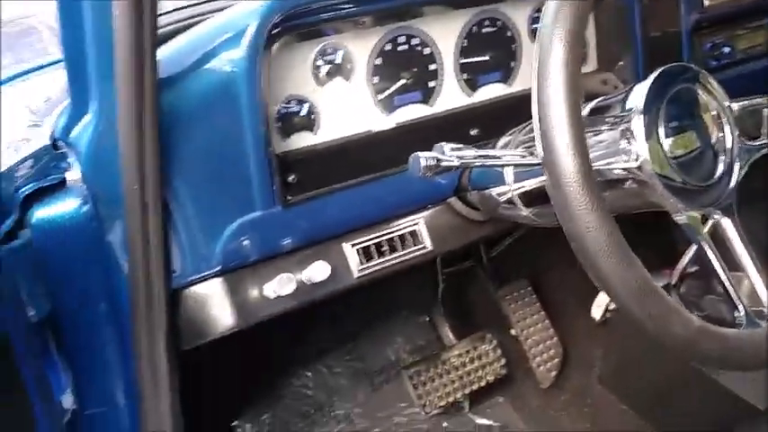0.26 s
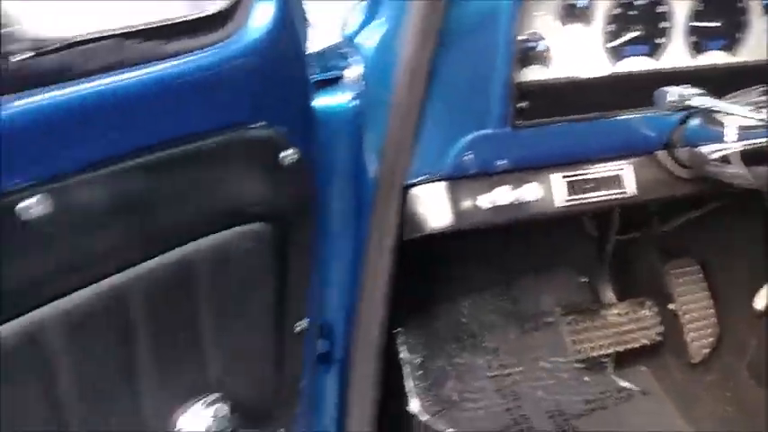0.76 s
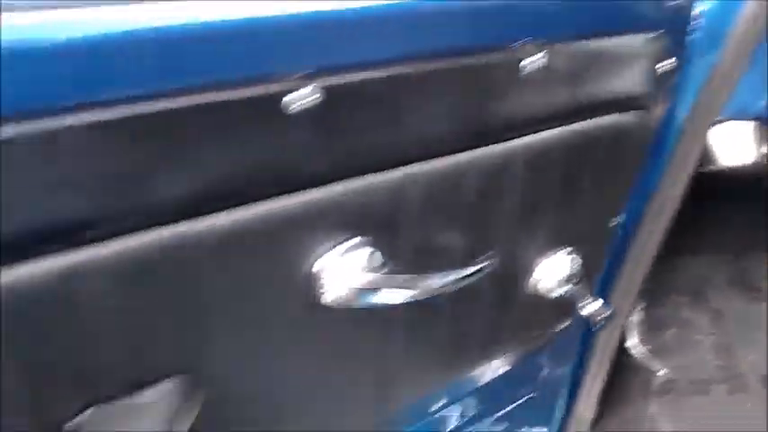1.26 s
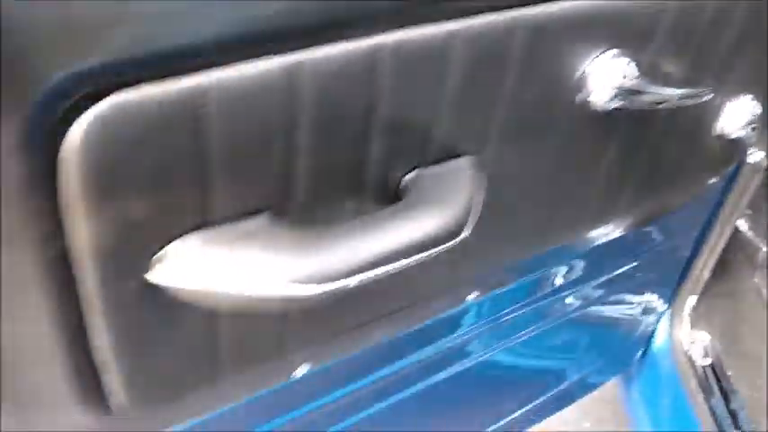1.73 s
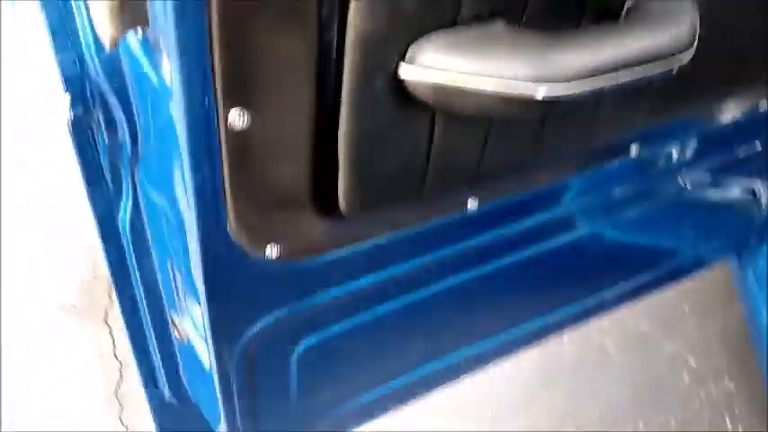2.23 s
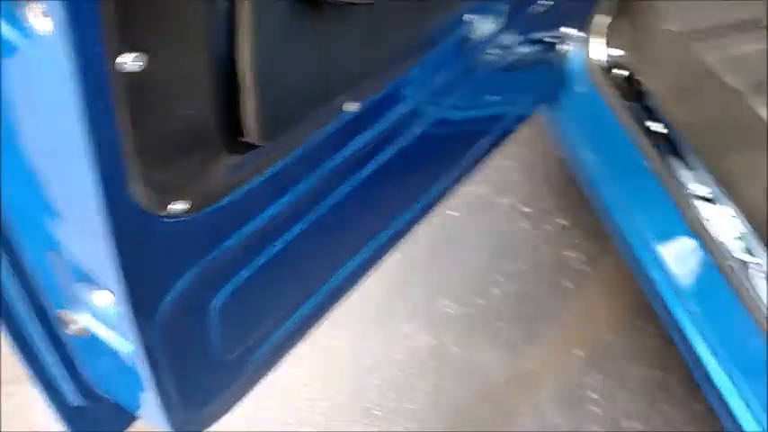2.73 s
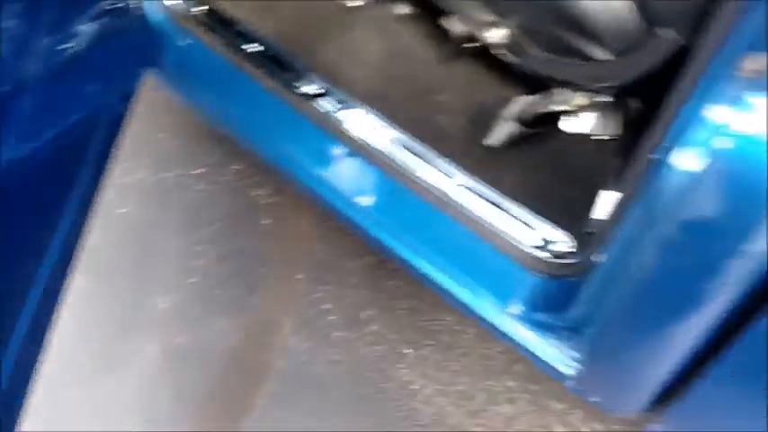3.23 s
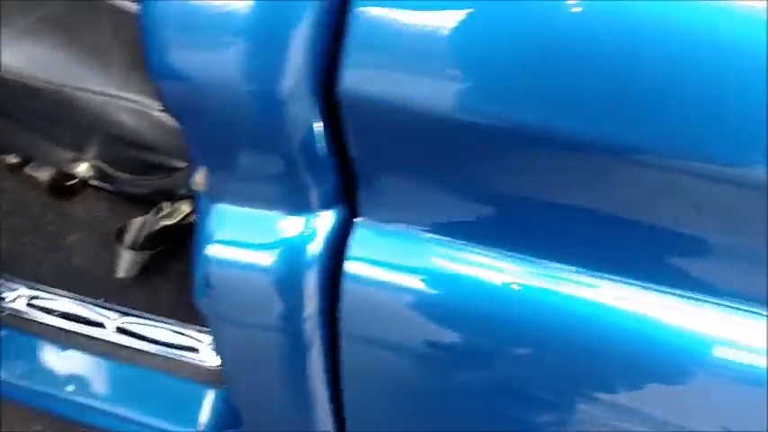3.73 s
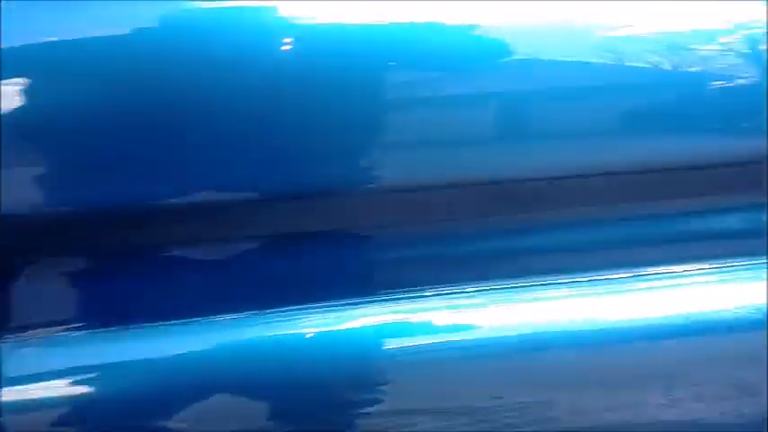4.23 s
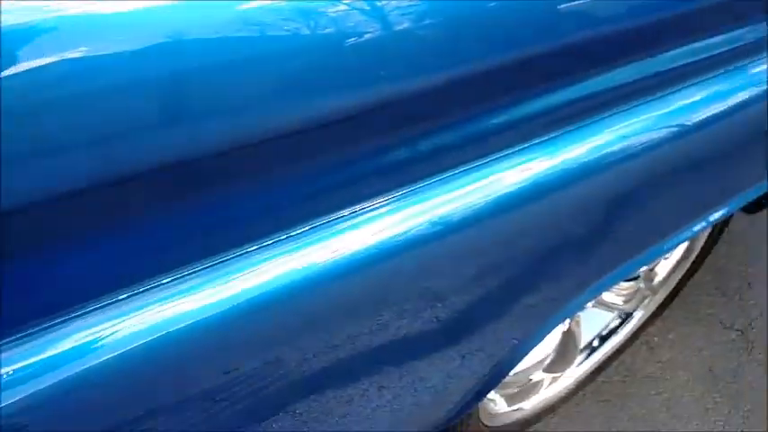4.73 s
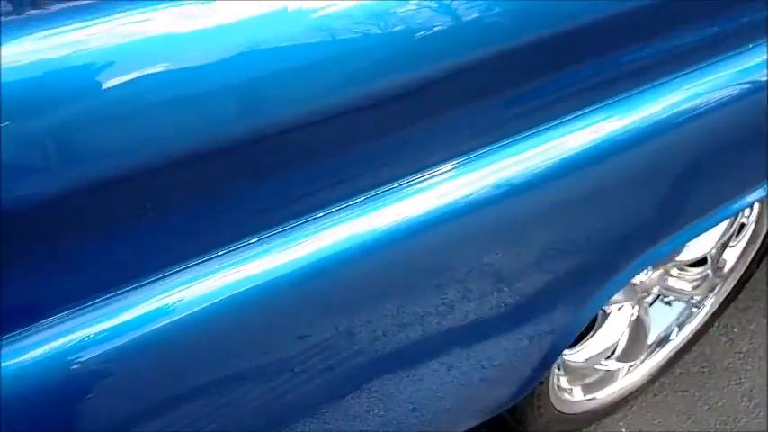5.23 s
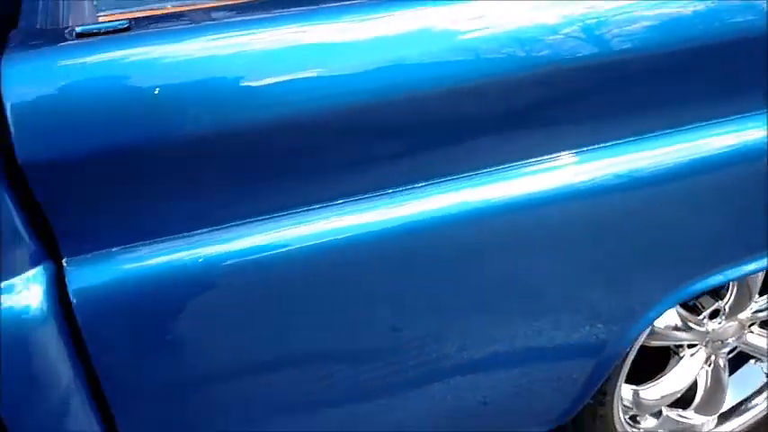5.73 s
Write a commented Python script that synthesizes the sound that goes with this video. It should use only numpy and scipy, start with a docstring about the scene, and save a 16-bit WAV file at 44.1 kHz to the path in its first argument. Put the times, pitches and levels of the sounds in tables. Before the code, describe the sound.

A V8 pickup idles steadily on a paved lot. The handheld microphone starts inside the boomy cab, backs out to the open door, then turns along the bodywork, where the exhaust gets raspier. Thin belt whines rise and fade, a small tap and dull handling bumps pass, and a heavy door slam makes the level duck and slowly recover.

```python
"""A V8 pickup idles on a paved lot; a hand-held microphone starts in the cab and backs out to the open door.
Throughout, uneven exhaust pulses ring the pipes and the cab; filtered noise makes the fan's rush,
and valve gear ticks under the hood. Belt whines swell and fade, dull bumps and one small tap come by.
After about three seconds the microphone turns past the doorway to the side of the body.
Near the end the door slams: struck resonances and noise. The recorder's gain ducks and slowly recovers."""
import sys
import numpy as np
from scipy import signal
from scipy.fft import rfft, irfft, next_fast_len
from scipy.io import wavfile
from scipy.ndimage import uniform_filter1d

SR = 44100
rng = np.random.default_rng(int(sys.argv[2]) if len(sys.argv) > 2 else 0)


def wrap_up_sound(samples):
    """Save the sound to the file named by the first command line argument, as 16-bit audio."""
    columns = np.atleast_2d(samples).T
    # keep every value between -1 and 1, then stretch to whole-number steps
    tamed = np.clip(columns, -1, 1)
    steps = np.round(tamed * 32767).astype(np.int16)
    wavfile.write(sys.argv[1], SR, steps)


N = 263718

# the idle speed wanders a little: (t/s, speed/rpm)
IDLE_SPEED = [(0.0, 944), (0.6, 942.8), (1.25, 939), (1.5, 941.4), (1.85, 928.5), (2.2, 945.3),
              (2.6, 926.6), (3.15, 948.5), (3.45, 937.3), (4.05, 932), (4.4, 933.3), (5.3, 937.6),
              (5.98, 933)]


def turn_crank():
    """Engine speed adds up to the crank angle in degrees; everything in the engine follows it."""
    rpm, = in_time(IDLE_SPEED)
    start_deg = -20
    crank = start_deg + np.cumsum(rpm) * 360 / 60 / SR
    return crank, rpm


# exhaust pulses of one two-turn cycle, made uneven by the two banks: (arrival angle/deg, level/dB)
FIRINGS = [(87, 5), (179, 4), (264, 8.5), (353, -3.5), (428, 1.5), (485, 1.5), (606.5, 8), (700, 7)]


def exhaust(crank, rpm):
    """Each firing sends a pressure pulse and a puff of turbulent gas down the pipes, and shakes the cab."""
    pulses = firing_pulses(crank, rpm, FIRINGS)
    return pipe_tones(pulses) + gas_puffs(pulses, crank) + cab_shake(crank, rpm)


# exhaust resonances, low, middle and barking: (f/Hz, width/Hz, relative level/dB)
BOOM_MODES = [(63.28, 2.64, -28)]
PIPE_MODES = [(112, 11.2, -30), (138.26, 5.12, -21.5), (228.6, 6, -33.5)]
BARK_MODES = [(272.4, 25, -50), (345.7, 17.5, -46.5), (428.7, 18.4, -42)]


def pipe_tones(pulses):
    """Pressure pulses set the gas in the pipes ringing at its own pitches."""
    boom, pipes, bark = (resonate(pulses, modes)[-N:] for modes in (BOOM_MODES, PIPE_MODES, BARK_MODES))
    return (heard(0, in_cab_db=1) * boom
            + heard(0, in_cab_db=-3) * pipes
            + heard(-7, in_cab_db=4.5, at_side_db=6.5, at_doorway_db=4.5) * bark)


# colour of the turbulent gas at the tailpipes: (f/Hz, relative level per Hz/dB)
PUFF_COLOUR = [(25, -1.5), (45, -2), (70, 0.5), (130, -0.5), (200, 0), (280, -3.5), (400, -11.5),
               (520, -28), (800, -42)]


def gas_puffs(pulses, crank):
    """The smoothed pulses open and close a noise of rushing gas."""
    # the puffs swell once a cycle, most at 41 degrees
    lope = from_db(2 * np.cos(np.radians(crank - 41) / 2))
    envelope = rms_one(lope * soften(pulses, hz=35.8)[-N:])
    return heard(-37, in_cab_db=-2, at_side_db=5) * envelope * noise(PUFF_COLOUR)


# the same firings as they shake the cab floor through the engine mounts: (arrival angle/deg, level/dB)
SHAKES = [(9, 0), (120.5, 1), (210, -4), (320.5, 5.5), (329.5, 3.5), (506, -5.5), (557, -4.5), (663, 4.5)]
# resonances of the cab: (f/Hz, width/Hz, relative level/dB)
CAB_MODES = [(91.2, 3.3, -32.5), (214.1, 8.4, -26), (341.6, 7.4, -34.5), (336.7, 20, -36)]


def cab_shake(crank, rpm):
    """Shaking from the engine mounts makes the cab resonate."""
    cab = resonate(firing_pulses(crank, rpm, SHAKES), CAB_MODES)[-N:]
    return heard(-12.5, in_cab_db=13, at_doorway_db=6.5) * cab


def firing_pulses(crank, rpm, contacts):
    """Muffled pressure pulses, begun one cycle early so that everything already rings."""
    firings = each_cycle(crank, contacts, scatter_deg=0.94, scatter_db=0.26)
    cycle = int(SR * 120 / rpm[0])   # samples in two turns
    running = np.concatenate([firings[:cycle], firings]) * cycle / len(contacts)
    return muffler(soften(running, hz=388), edge_hz=400.0)


def muffler(x, edge_hz):
    """The silencer passes the rumble and swallows the sharp front of each pulse."""
    return signal.sosfilt(signal.butter(6, edge_hz, fs=SR, output="sos"), x)


# latch contact, panel impact, rebounds, latch settling: (t/s, body level/dB, metal crack level/dB)
SLAM_BLOWS = [(4.7509, 3, 5.5), (4.755, 1, 1), (4.7613, 0, 0), (4.777, -11, -6), (4.8105, -15, -13),
              (4.829, -21, -24)]
# ringing of the steel skin: (f/Hz, width/Hz, relative level/dB)
DOOR_MODES = [(162, 54, -19), (212, 26, -5.5), (325, 75, 5.5), (410, 43, 1), (570, 69, 4.5), (650, 46, 5),
              (959, 47, -0.5), (1090, 86, -7), (1288, 30, -2), (1600, 49, 2), (1810, 37, -1.5),
              (2600, 48, -18.5), (2880, 71, -22)]
# colours of the cab's rumble and of the latch's crack: (f/Hz, relative level per Hz/dB)
SHELL_COLOUR = [(70, 3), (200, 10), (400, 1), (650, 1.5), (780, -4.5), (1000, -7.5), (1400, -8),
                (1750, -7.5), (2100, -19.5), (3000, -34), (4000, -37)]
CRACK_COLOUR = [(1000, -7), (2200, 6), (3000, 2), (3900, -8.5), (5000, -10), (6300, -6.5), (8000, -14.5),
                (11000, -18), (15000, -43)]


def door():
    """The latch cracks, the steel skin rings and the cab rumbles on behind it."""
    s, body_db, crack_db = np.transpose(SLAM_BLOWS)
    blows = clicks(s, from_db(body_db))
    latch = clicks(s, from_db(crack_db))
    skin = strike(blows, DOOR_MODES, soft_hz=2250)
    rumble = burst(blows, t60=0.062) + from_db(-12) * burst(blows, t60=0.31)
    shell = soften(rumble, hz=700) * noise(SHELL_COLOUR)
    snap = burst(latch, t60=0.069) + from_db(-8.0) * burst(latch, t60=0.012)
    crack = snap * noise(CRACK_COLOUR)
    return from_db(3.0) * skin + from_db(-3.0) * shell + from_db(-20.5) * crack


def engine_bay(crank):
    """Rush and ticks under the hood reach the microphone with short echoes; the whines come without."""
    # the rush swells gently with the firings
    swell = rms_one(soften(each_cycle(crank, FIRINGS, scatter_deg=15.0, scatter_db=3.5), hz=70))
    throb = rms_one(3.5 + 0.68 * swell)
    rush = throb * (fan() + belt() + hiss())
    return reflect(rush + valve_gear(crank)) + whines(crank)


# colour of the fan's rush: (f/Hz, relative level per Hz/dB)
FAN_COLOUR = [(420, 6.5), (520, -2), (680, 3), (800, -0.5), (1000, 0.5), (1300, -1), (1550, -0.5),
              (1850, -10.5), (2100, -15), (2600, -27)]
# ringing of the engine bay panels: (f/Hz, width/Hz, relative level/dB)
PANEL_MODES = [(545, 2.1, -0.5), (663, 8.5, 3), (794, 10, -10.5), (906, 13, -3.5), (1035, 21, -3.5),
               (1283, 25, 1.5), (1384, 18, -4), (1523, 22, -2), (1668, 19, 0.5)]


def fan():
    """The fan is a rush of noise, with panels kept ringing by noise of their own."""
    rush = noise(FAN_COLOUR) + from_db(-7.5) * ringing(PANEL_MODES)
    return heard(-47.5, in_cab_db=-2, at_side_db=-0.5) * rush


def belt():
    """The belt sings: one narrow resonance kept ringing by noise."""
    song = ringing([(1864, 22, 0)])   # f/Hz, width/Hz, level/dB
    return heard(-63, in_cab_db=1.5, at_side_db=-7, at_doorway_db=10) * song


# colours of the hiss, its bright sizzle and its top, heard in the cab: (f/Hz, relative level per Hz/dB)
HISS_COLOUR = [(2000, 12), (2250, 0.5), (2550, -2), (3000, 3.5), (3600, -0.5), (4300, -4.5), (5300, -14.5),
               (6400, -12.5), (7500, -21.5), (9000, -24.5), (12000, -49), (15500, -32)]
SIZZLE_COLOUR = [(5600, -9), (6200, 0.5), (6700, -4.5), (7250, 0), (7800, -9.5), (9000, -30)]   # also the bright ring of the ticks
FIZZ_COLOUR = [(7000, -9), (8200, 1.5), (9300, -10.5), (11000, -15)]
# ringing of the valve covers and manifolds: (f/Hz, width/Hz, relative level/dB)
COVER_MODES = [(2080, 42, 1.5), (2400, 110, 2), (2840, 83, 3.5), (3034, 43, 0), (3520, 110, -14),
               (3930, 52, -7.5), (4350, 75, -15.5)]


def hiss():
    """Bright noise and ringing covers share one random, grainy change of level."""
    grain_db, grain_hz = 2.0, 60   # depth and pace of the level changes
    grain = rms_one(from_db(grain_db * rms_one(soften(rng.standard_normal(N), grain_hz))))
    steady = (heard(-63.5, in_cab_db=-2.5, at_side_db=1, at_doorway_db=5.5) * noise(HISS_COLOUR)
              + heard(-63.5, in_cab_db=-8.5, at_side_db=-5) * ringing(COVER_MODES)
              + heard(-79.5, in_cab_db=-2, at_side_db=5.5) * noise(SIZZLE_COLOUR)
              + heard(-89.5, in_cab_db=9.5) * noise(FIZZ_COLOUR))
    return grain * steady


# valve gear and manifold ticks: (crank angle/deg, relative level/dB)
TICKS = [(170, -4.5), (181, -4), (195, -7.5), (0, -11.5), (48, -12.5), (88, -10.5), (228, -14),
         (268, -16.5), (395, -10.5), (444, -10.5), (510, -15.5), (560, -12.5), (638, -10.5), (660, -9)]
# colour of a tick: (f/Hz, relative level per Hz/dB)
TICK_COLOUR = [(1800, 7), (3000, 8), (4200, 4), (5300, -0.5), (6800, -2), (8500, -10), (11000, -29.5),
               (15000, -28)]


def valve_gear(crank):
    """Short noise bursts tick in step with the camshaft; loose ones clatter between them."""
    clatter_per_s, clatter_db, spread_db = 29, -15, 3.5
    loose = rng.random(N) < clatter_per_s / SR
    clatter = loose * from_db(clatter_db + spread_db * rng.uniform(-1, 1, N))
    regular = each_cycle(crank, TICKS, scatter_deg=4.0, scatter_db=1.8)
    envelope = rms_one(soften(dying(regular + clatter, t60=0.032), hz=300))
    # the bright ring opens up along the side
    colour = (heard(-61.5, in_cab_db=-10.5) * noise(TICK_COLOUR)
              + heard(-80, at_side_db=3.5) * noise(SIZZLE_COLOUR))
    return envelope * colour


# belt-driven idlers: (multiple of crank speed, relative level/dB)
IDLERS = [(35.2, -59), (51.4, -66)]
# average level of the pulley and alternator whines along the walk: (t/s, level/dB)
PULLEY_LEVEL = [(0, -65.5), (1.5, -60), (3.8, -64), (5.2, -64), (5.6, -52.5), (5.98, -58)]
ALTERNATOR_LEVEL = [(0, -68), (.7, -67.5), (1.3, -55.5), (2.5, -58.5), (3.1, -63), (3.7, -65.5),
                    (4.1, -52.5), (5.1, -54.5), (5.6, -66)]


def whines(crank):
    """Idlers, pulley and alternator each sing at a fixed multiple of crank speed."""
    idlers = sum(whine(crank, multiple, db) for multiple, db in IDLERS)
    pulley = whine(crank, 64.4, *in_time(PULLEY_LEVEL))
    alternator = whine(crank, 42.9, *in_time(ALTERNATOR_LEVEL))
    return heard(3, in_cab_db=-0.5, at_side_db=-7.5) * idlers + pulley + alternator


def whine(crank, multiple, db):
    """A thin tone locked to the crank, fluttering a little in level and phase."""
    swell, slip = rms_one(soften(rng.standard_normal((2, N)), hz=5.3))
    tone = np.sqrt(2) * np.sin(multiple * np.radians(crank) + 0.32 * slip)
    return from_db(db + 2.0 * swell) * tone


# dull bumps of steps and handling: (t/s, relative level/dB)
BUMPS = [(1.207, -12.5), (4.195, -17.5), (4.316, -11.5), (5.318, -15), (5.34, -5.5), (5.525, -14.5),
         (5.765, -8), (5.805, -7), (5.846, -7), (5.965, -11)]
# what they ring: (f/Hz, width/Hz, relative level/dB)
BUMP_MODES = [(120, 65, 2.5), (224.4, 39, 5), (288, 41, 1), (438, 46, -4), (614, 130, -17.5)]


def handling():
    """Each dull bump is a cushioned blow with a short low rustle of noise after it."""
    s, db = np.transpose(BUMPS)
    envelope = soften(burst(clicks(s, from_db(db)), t60=0.16), hz=45)
    low_noise = rms_one(soften(resonate(rng.standard_normal(N), BUMP_MODES), hz=450))
    return knocks(BUMPS, BUMP_MODES, soft_hz=447) + from_db(-16.0) * envelope * low_noise


# a small tap: (t/s, level/dB)
TAPS = [(2.3785, -27)]
# what it rings: (f/Hz, width/Hz, relative level/dB)
TAP_MODES = [(680, 110, 3.5), (890, 160, 9), (1100, 120, 10.5), (1430, 130, 5), (2180, 450, -12),
             (3470, 740, -14), (5400, 700, -17)]


def small_tap():
    """A light, harder blow rings higher resonances than the bumps."""
    return knocks(TAPS, TAP_MODES, soft_hz=5070)


# echoes off the ground and the bodywork: (delay at start t/s, delay at end t/s, level/dB)
BOUNCES = [(.0021, 0.002895, -27), (.0056, .0047, -18)]


def reflect(x):
    """Short echoes whose paths change with the walk comb the sound."""
    n = np.arange(N)
    out = x
    for first, last, db in BOUNCES:
        delay = SR * np.linspace(first, last, N)
        out = out + from_db(db) * np.interp(n - delay, n, x)
    return out


def heard(db, in_cab_db=0, at_side_db=0, at_doorway_db=0):
    """Gain by the open door, and its change in dB as the microphone passes the other places."""
    in_cab = 1 - move(middle_s=1.12, takes_s=1.0)
    at_side = move(middle_s=2.83, takes_s=0.8)
    at_doorway = np.exp(-((np.arange(N) / SR - 3.45) / 0.74) ** 2)   # centre and width in s
    return from_db(db + in_cab_db * in_cab + at_side_db * at_side + at_doorway_db * at_doorway)


def move(middle_s, takes_s):
    """A smooth step from 0 to 1."""
    progress = np.clip((np.arange(N) / SR - middle_s) / takes_s, -.5, .5)
    return .5 + .5 * np.sin(np.pi * progress)


def each_cycle(crank, contacts, scatter_deg, scatter_db):
    """Pulses at fixed crank angles, a little different in every two-turn cycle."""
    angle, db = np.transpose(contacts)
    cycles = np.arange(-1, 50)[:, None]
    late, strong = np.clip(rng.standard_normal((2, len(cycles), len(angle))), -2, 2)
    angles = 720 * cycles + angle + scatter_deg * late
    times = np.interp(angles, crank, np.arange(N) / SR, left=-1, right=-1)
    return clicks(times.ravel(), from_db(db + scatter_db * strong).ravel())


def knocks(events, modes, soft_hz):
    """A table of blows on one body."""
    s, db = np.transpose(events)
    return strike(clicks(s, from_db(db)), modes, soft_hz)


def strike(blows, modes, soft_hz):
    """A cushioned blow rings a body; neighbouring modes swing opposite ways. Peak equals the hardest blow."""
    cushioned = soften(blows, soft_hz)
    ring = resonate(cushioned, modes[::2]) - resonate(cushioned, modes[1::2])
    return blows.max() * ring / np.abs(ring).max()


def burst(pulses, t60):
    """Envelope of overlapping decays that add in power."""
    return np.sqrt(dying(pulses ** 2, t60 / 2))


def dying(x, t60):
    """Every pulse dies away exponentially, by 60 dB in t60 seconds."""
    return signal.lfilter([1], [1, -from_db(-60 / (t60 * SR))], x + 1e-18)


def clicks(times, sizes):
    """Single-sample pulses at the given times."""
    at = np.round(np.asarray(times) * SR).astype(int)
    inside = (at >= 0) & (at < N)
    return np.bincount(at[inside], np.asarray(sizes)[inside], N)


def ringing(modes):
    """Resonances kept ringing by noise; rms 1."""
    return rms_one(resonate(rng.standard_normal(N), modes))


def resonate(x, modes):
    """Parallel resonances, each with its given gain on top."""
    out = 0
    for hz, width, db in modes:
        r = np.exp(-np.pi * width / SR)   # narrower rings longer
        top = np.array([1, 0, -1]) * (1 - r * r) / 2
        bottom = [1, -2 * r * np.cos(2 * np.pi * hz / SR), r * r]
        out = out + from_db(db) * signal.lfilter(top, bottom, x + 1e-18)
    return out


def noise(spectrum):
    """Noise of a given colour that falls away beyond its ends; rms 1."""
    hz, db = np.transpose(spectrum)
    size = next_fast_len(N)
    f = np.maximum(np.arange(size // 2 + 1) * SR / size, 1)
    skirts = np.minimum(1, np.minimum(f / hz.min(), hz.max() / f)) ** 6
    gain = from_db(np.interp(np.log(f), np.log(hz), db)) * skirts
    return rms_one(irfft(rfft(rng.standard_normal(size)) * gain, size)[:N])


def soften(x, hz):
    """Two one-pole low-passes in a row."""
    r = np.exp(-2 * np.pi * hz / SR)
    return signal.lfilter([(1 - r) ** 2], [1, -2 * r, r * r], x + 1e-18)


def in_time(rows):
    """Each column of a curve table at every sample."""
    s, *columns = np.transpose(rows)
    return [np.interp(np.arange(N) / SR, s, c) for c in columns]


def rms_one(x):
    """Scale to unit power."""
    return x / np.sqrt(np.mean(x ** 2) + 1e-20)


def from_db(db):
    """Decibels to gain."""
    return 10 ** (np.asarray(db) / 20)


def scene():
    """Engine, door and small knocks at one microphone."""
    crank, rpm = turn_crank()
    engine = exhaust(crank, rpm) + engine_bay(crank)
    return (engine + door() + handling() + small_tap())[None]


def gain_control(x, ceiling_db, release_db_per_s, window_s):
    """Gain drops within milliseconds when the level passes the ceiling, then creeps back."""
    window = int(window_s * SR)
    level_db = 10 * np.log10(np.maximum(uniform_filter1d(x ** 2, window), 1e-12))
    excess_db = np.maximum(level_db - ceiling_db, 0)
    recovery = release_db_per_s * np.arange(N) / SR
    # hold the largest cut so far, less what has been recovered since
    cut_db = np.maximum.accumulate(excess_db + recovery, axis=-1) - recovery
    return x * from_db(-uniform_filter1d(cut_db, window))


def record(dry):
    """Gain control, a faint steady hiss, rounded peaks and a steep top cut."""
    held = gain_control(dry, ceiling_db=-12.0, release_db_per_s=10.0, window_s=0.0042)
    hissy = held + from_db(-87) * rng.standard_normal(N)
    rounded = .75 * np.tanh(hissy / .75)
    top_cut = signal.ellip(10, .1, 80, 15500, fs=SR, output="sos")   # edge at 15500 Hz
    return signal.sosfilt(top_cut, rounded)


dry = scene()
out = record(dry)
wrap_up_sound(out)
```